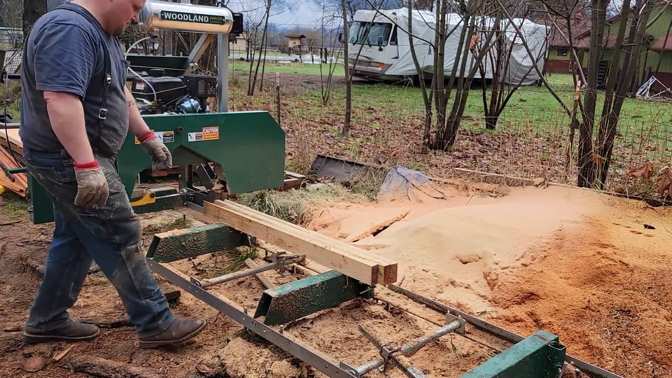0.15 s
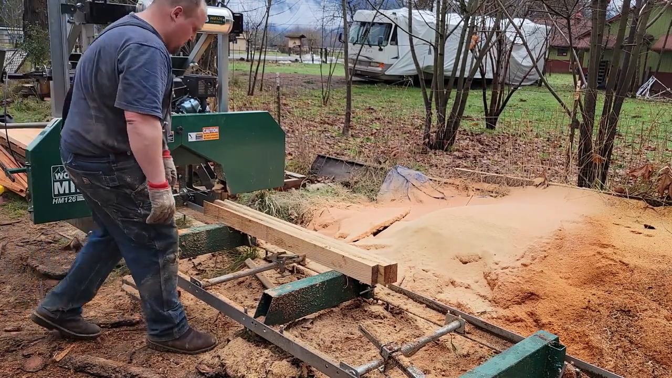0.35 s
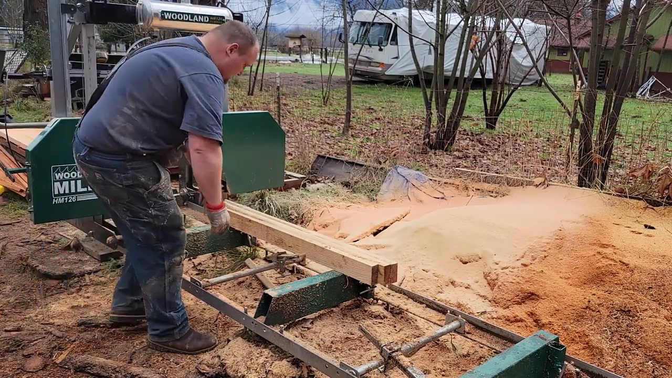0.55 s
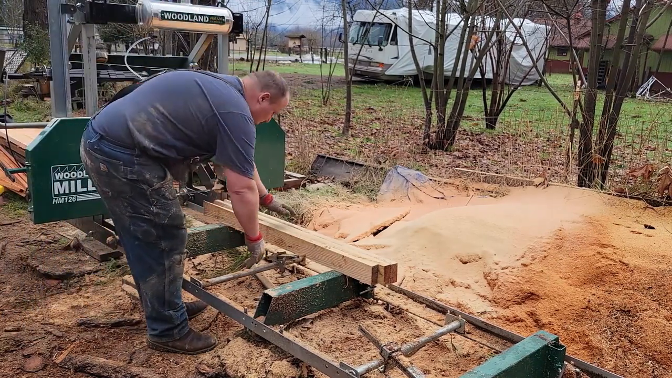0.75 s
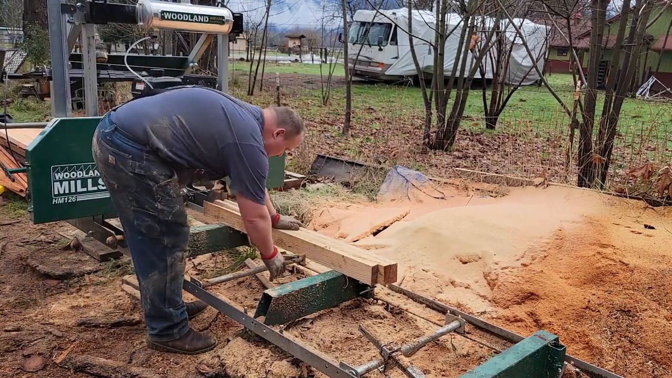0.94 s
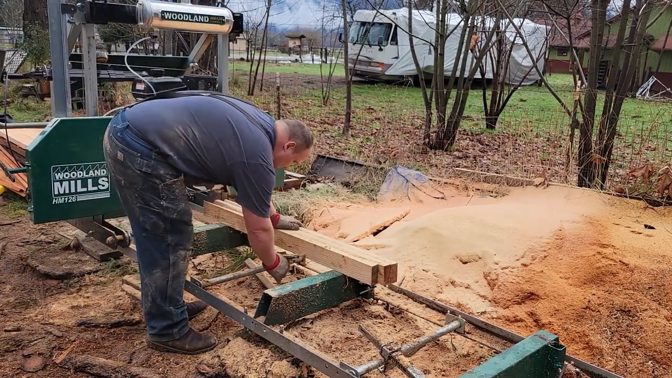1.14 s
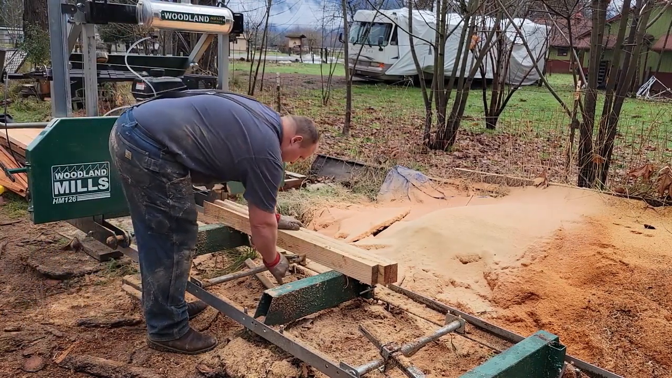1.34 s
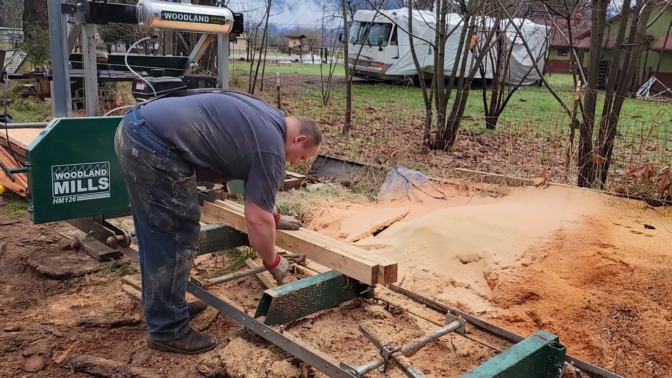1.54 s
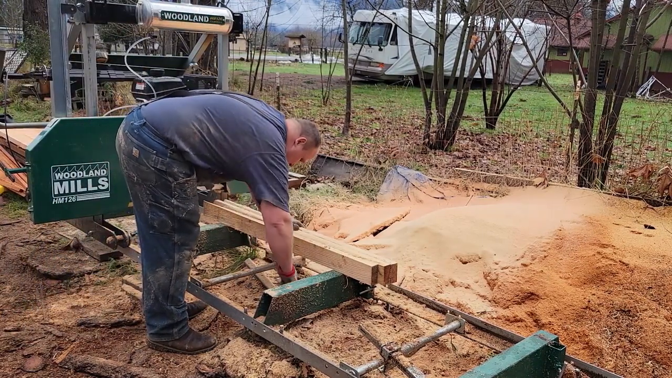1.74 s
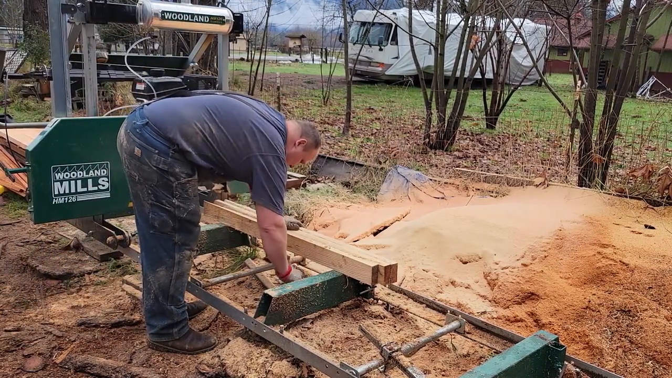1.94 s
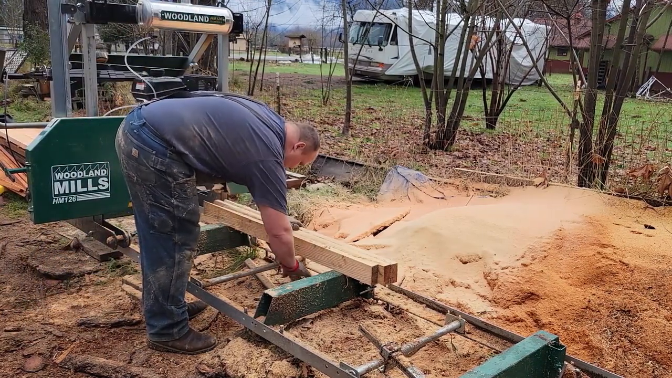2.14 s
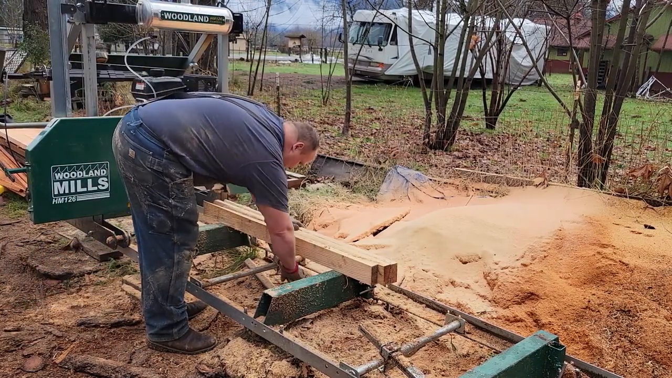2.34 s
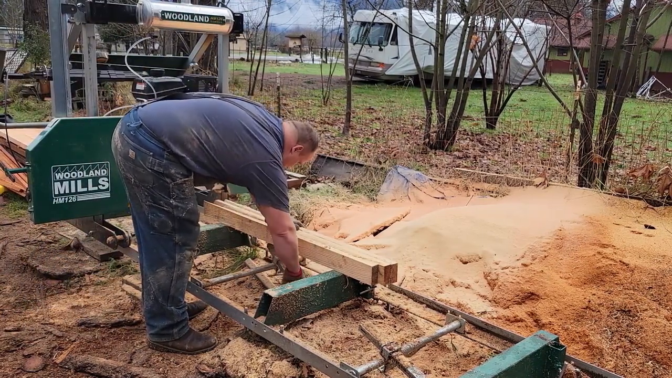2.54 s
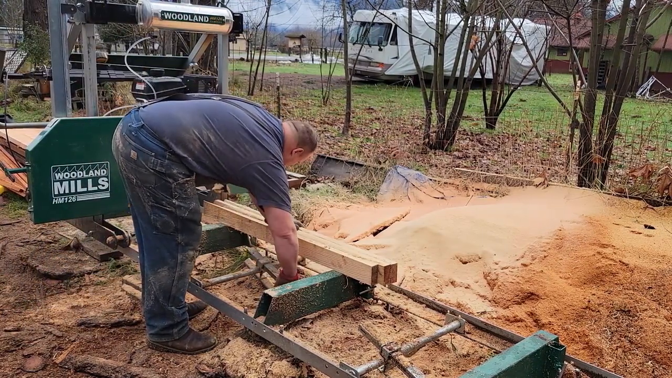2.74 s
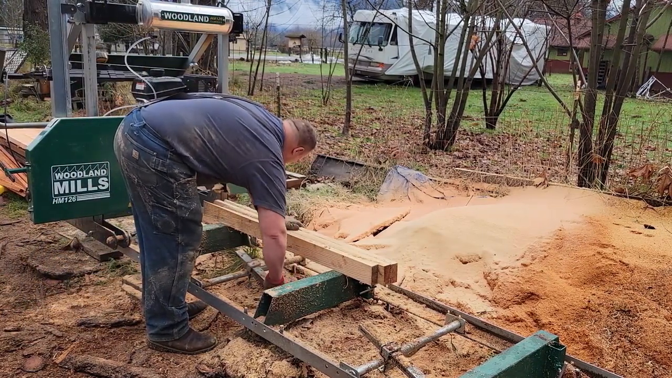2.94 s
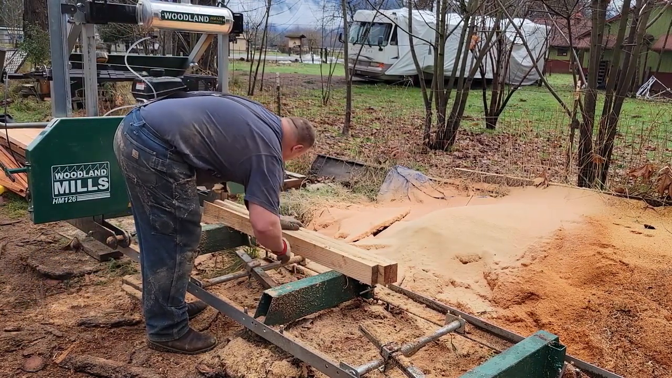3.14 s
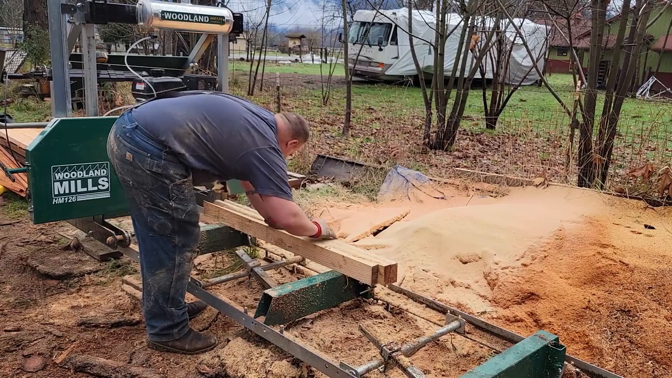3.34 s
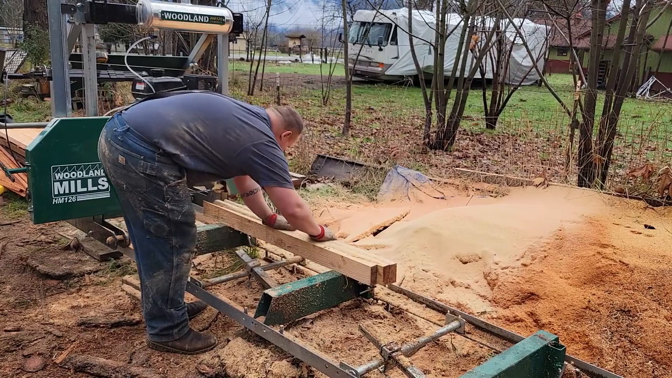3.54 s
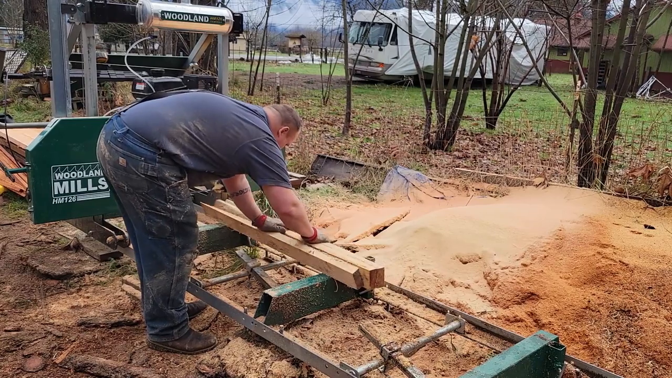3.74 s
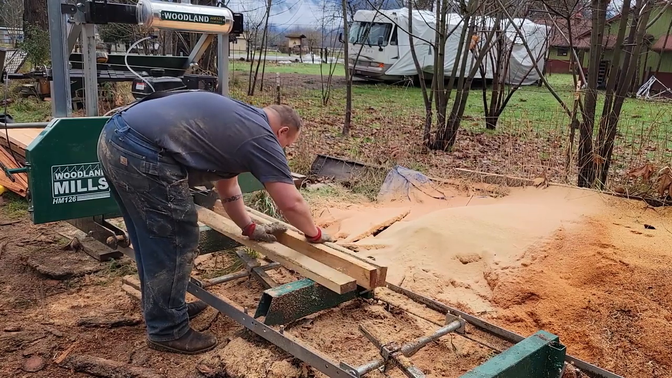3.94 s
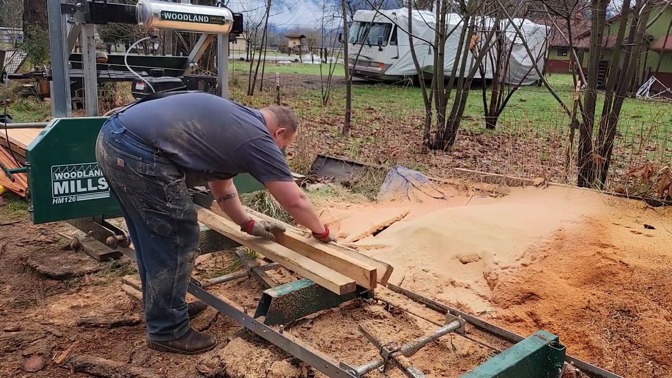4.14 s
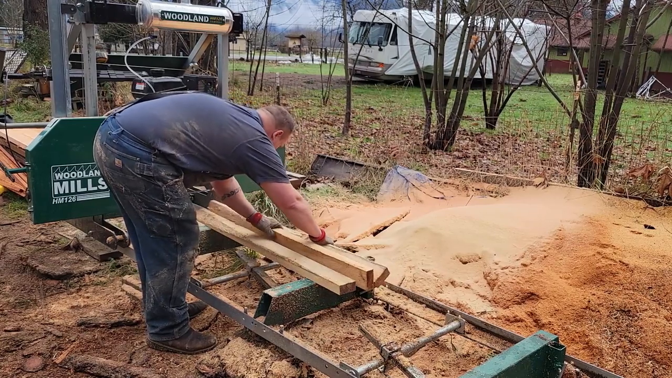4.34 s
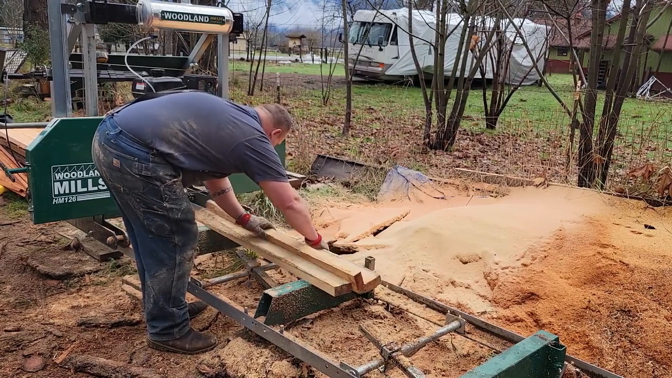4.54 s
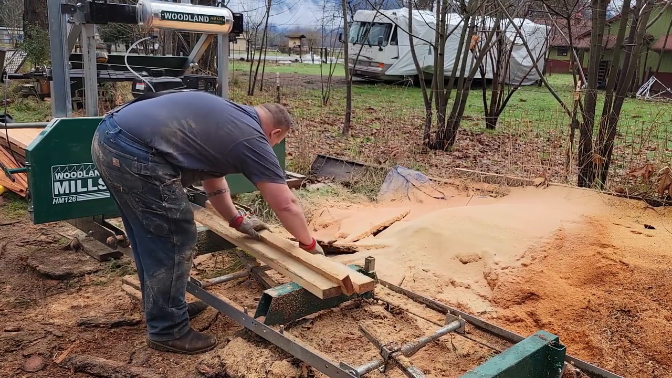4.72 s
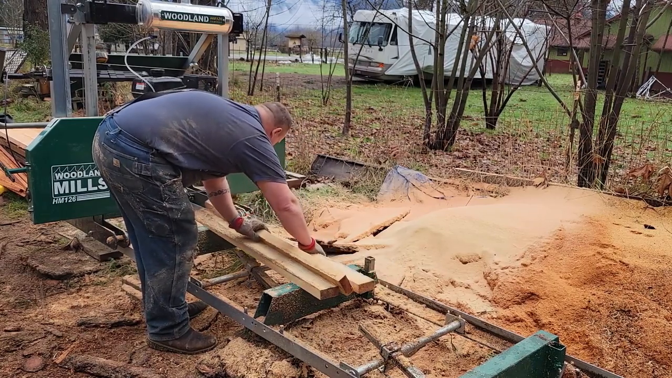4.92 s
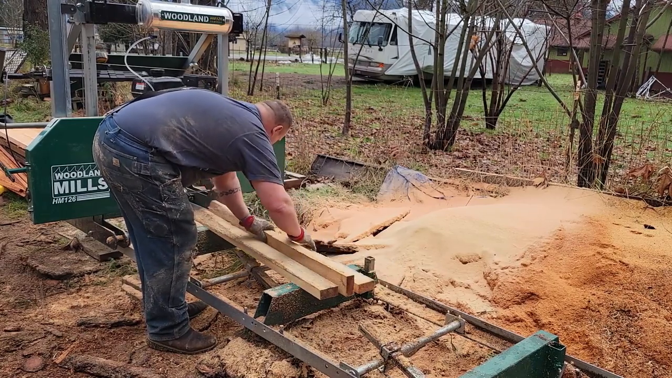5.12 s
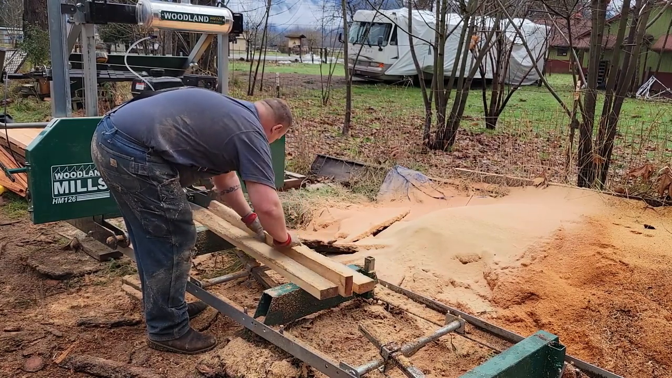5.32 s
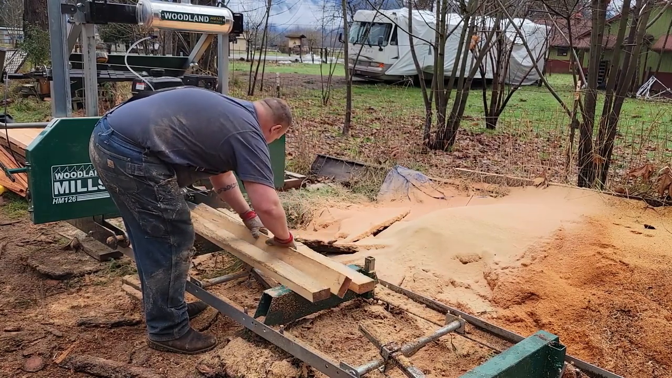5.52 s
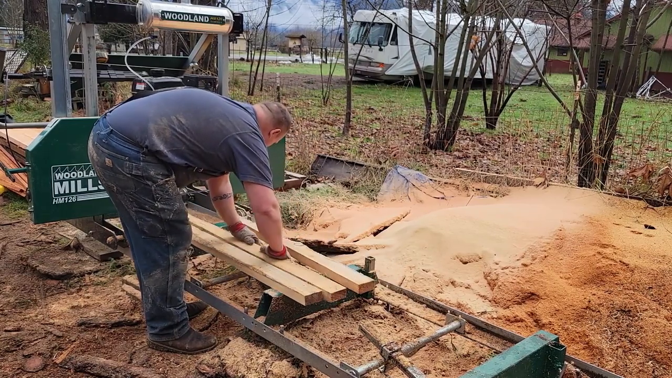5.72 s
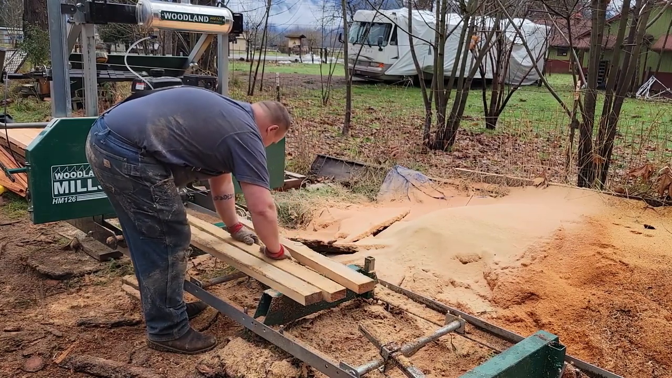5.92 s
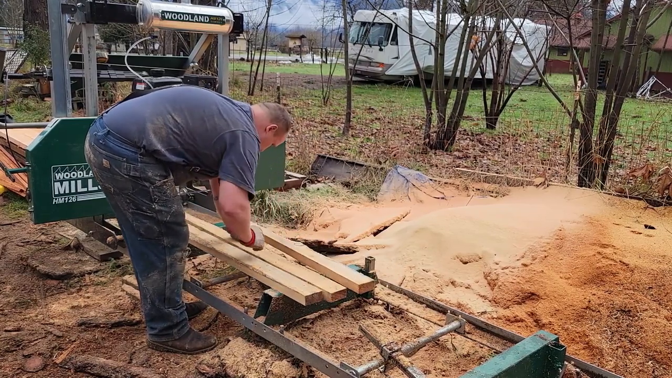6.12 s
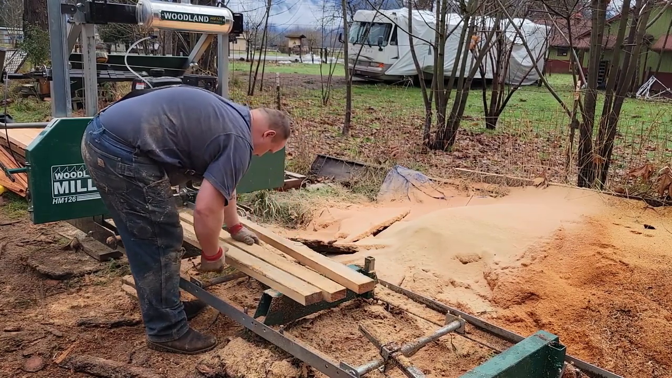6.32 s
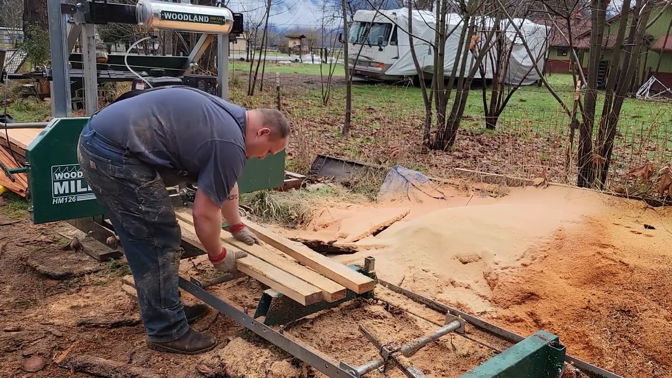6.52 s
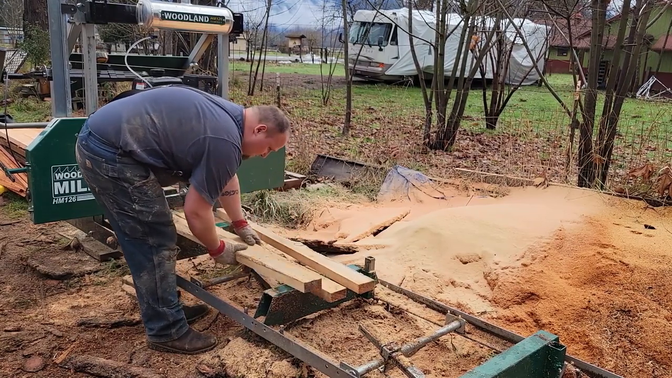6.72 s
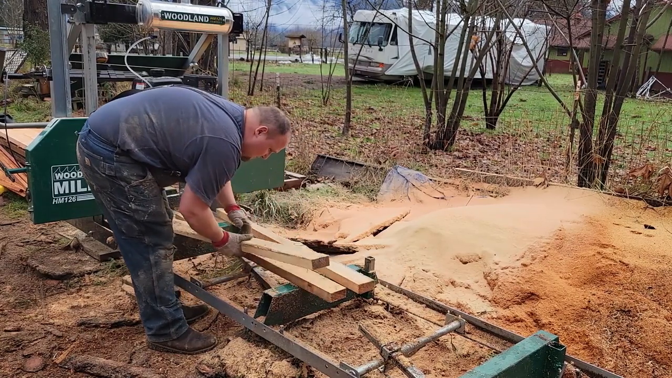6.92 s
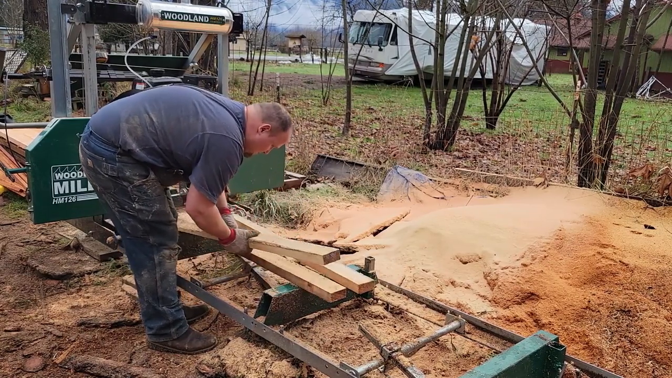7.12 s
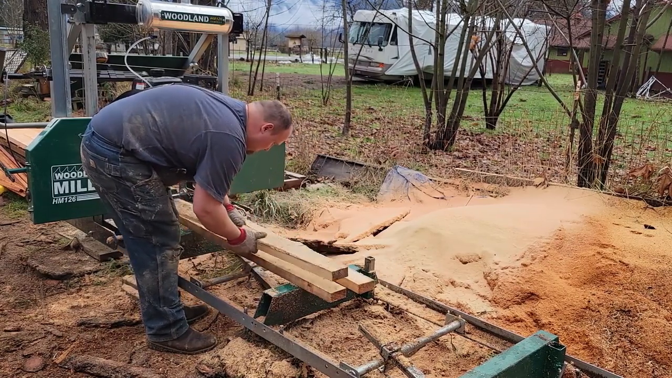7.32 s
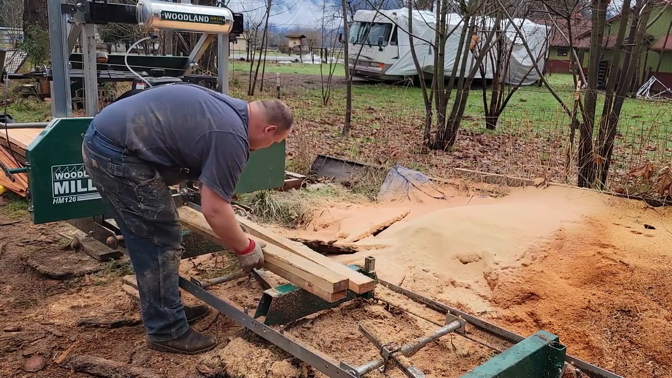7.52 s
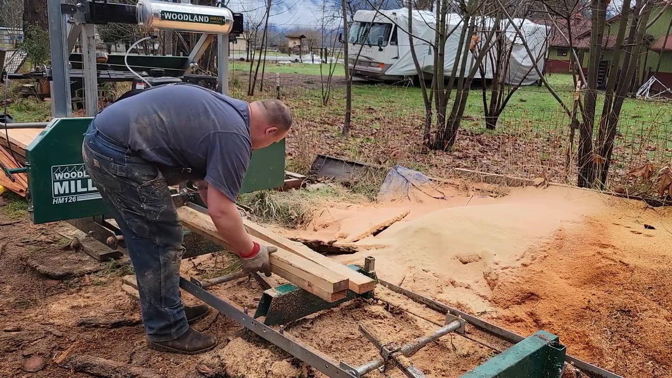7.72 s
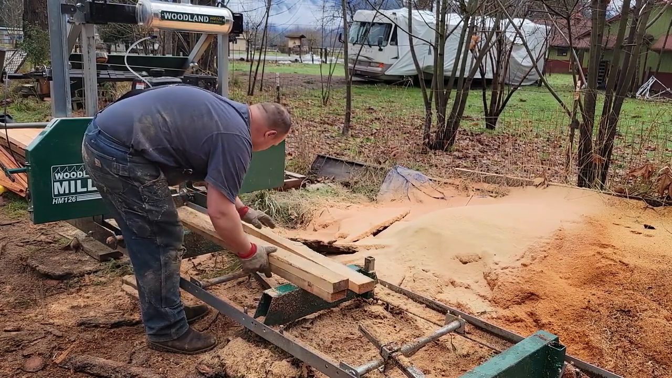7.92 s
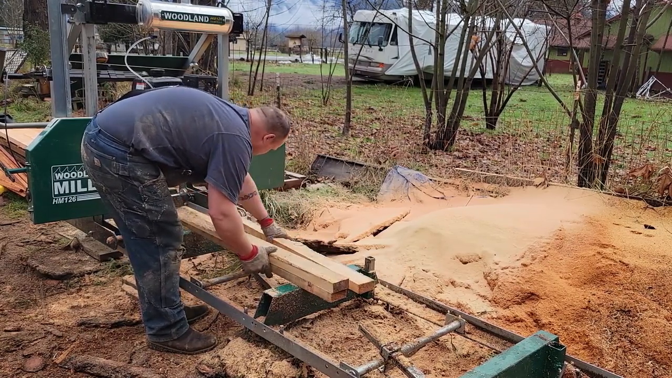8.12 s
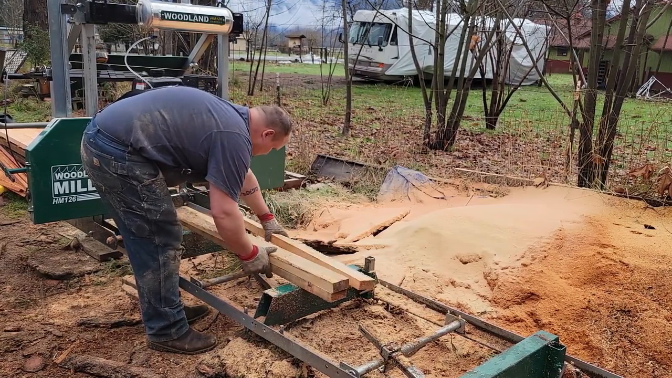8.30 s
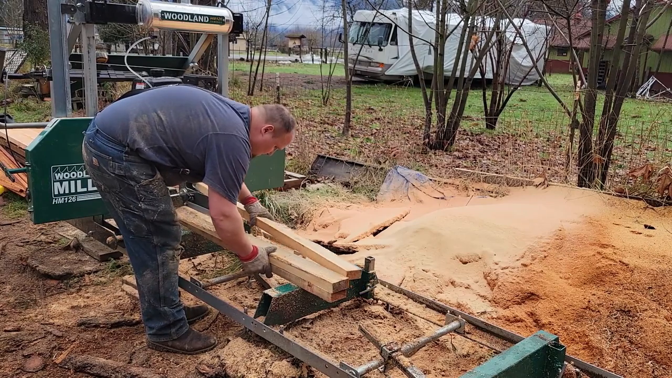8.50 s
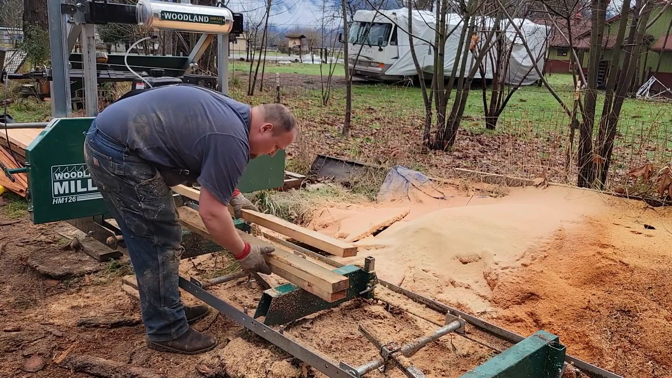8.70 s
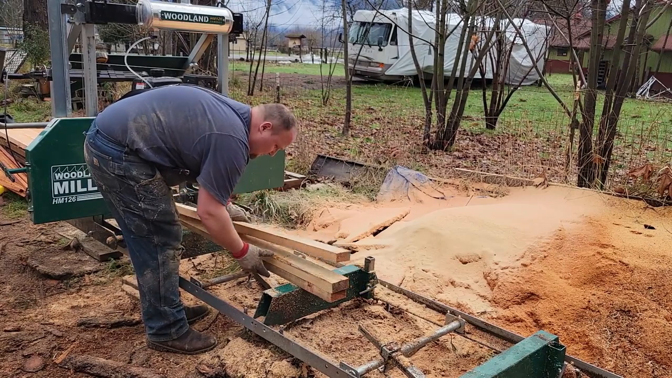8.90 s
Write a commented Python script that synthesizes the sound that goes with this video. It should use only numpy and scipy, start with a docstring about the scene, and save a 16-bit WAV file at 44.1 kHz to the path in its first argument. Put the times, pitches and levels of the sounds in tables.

```python
"""Stacking boards at a small sawmill

Outdoors, over a low machine hum, a worker steps up on wood chips, knocks the steel log clamp loose
and slides it back; chatter and friction ring its modes. Sawn boards are tipped onto the steel bed and
stacked, with rubs and bounces. Each blow rings their bending modes and the bed, and crushes sawdust."""
import sys
import numpy as np
from scipy import signal
from scipy.fft import rfft, irfft, next_fast_len
from scipy.io import wavfile
from scipy.ndimage import map_coordinates

SR = 44100
rng = np.random.default_rng(int(sys.argv[2]) if len(sys.argv) > 2 else 0)


def waveform_to_disk(signal):
    """Save audio, clipped to [-1, 1], as 16-bit WAV at the path in sys.argv[1]."""
    frames = np.transpose(np.atleast_2d(signal))
    scaled = np.clip(frames, -1, 1) * 32767
    samples = np.round(scaled).astype(np.int16)
    wavfile.write(sys.argv[1], SR, samples)


N = 395136
TIME = np.arange(N) / SR
BAND_EDGES_HZ = np.geomspace(22, 17000, 30)
BAND_CENTRES_HZ = np.sqrt(BAND_EDGES_HZ[1:] * BAND_EDGES_HZ[:-1])


def from_db(db):
    """Decibels to gain."""
    return np.exp(np.asarray(db) * np.log(10) / 20)


def unit_rms(x):
    """Scale to rms 1."""
    return x / np.sqrt(np.mean(x ** 2) + 1e-20)


def unit_onset(x):
    """Scale to rms 1 over the first 25 ms."""
    return x / np.sqrt(np.mean(x[:, :SR // 40] ** 2) + 1e-20)


def at_hz(table, hz):
    """Read a table on a log-frequency axis."""
    freq_hz, values = np.transpose(table)
    return np.interp(np.log(hz), np.log(freq_hz), values)


def butter(x, hz, kind="low", order=2):
    """Butterworth filter."""
    return signal.sosfilt(signal.butter(order, hz, kind, fs=SR, output="sos"), x)


def coloured(x, spectrum, tilt_db_per_oct=0):
    """Shape noise to a tilted spectrum, at rms 1."""
    size = next_fast_len(x.shape[-1])
    hz = np.maximum(np.fft.rfftfreq(size, 1 / SR), 1)
    gain = from_db(at_hz(spectrum, hz) + tilt_db_per_oct * np.log2(hz))
    return unit_rms(irfft(rfft(x, size) * gain, size)[..., :x.shape[-1]])


def stereo(pair, correlation):
    """Two independent signals to correlated left and right."""
    mid, side = pair
    return np.sqrt(1 + correlation) * mid + np.sqrt(1 - correlation) * side * [[1], [-1]]


def add(out, start_s, sound, pan_db):
    """Mix in a stereo sound; pan_db is left minus right."""
    at = round(start_s * SR)
    panned = sound * from_db([[pan_db / 2], [-pan_db / 2]])
    out[:, at:at + sound.shape[1]] += panned[:, :N - at]


def wobble(cutoff_hz):
    """Slow random fluctuation, rms 1."""
    return unit_rms(butter(rng.standard_normal(N), cutoff_hz))


def slips(size, per_s, spread_db):
    """Friction: tiny catches of random size at random moments."""
    spread = from_db(spread_db * np.minimum(rng.exponential(1, (2, size)), 4))
    heights = spread * rng.standard_normal((2, size))
    caught = rng.random((2, size)) < per_s / SR
    return stereo(heights * caught, correlation=0.25)


# Stereo likeness of noise: freq_hz, correlation
CORRELATION = [(100, 1), (250, 0.76), (600, 0.09), (2000, 0.23), (12000, 0.69)]


def noise_bands(size):
    """Third-octave stereo noise: bands x 2 x size."""
    white = rng.standard_normal((2, 2, size + SR // 10))
    bands = []
    for k, hz in enumerate(BAND_CENTRES_HZ):
        pair = butter(white[k % 2], BAND_EDGES_HZ[k:k + 2], "band")[:, -size:]
        bands.append(stereo(pair, at_hz(CORRELATION, hz)))
    return np.array(bands)


def dense_modes(bands, spectrum, decay, t, t60_scale, crack_s, weight=1):
    """Modes too dense to tell apart: a short crack, then a tail dying band by band."""
    hz = BAND_CENTRES_HZ[:, None]
    start = rng.integers(bands.shape[2] - len(t))
    t60_s = at_hz(decay, hz) * t60_scale
    envelopes = from_db(at_hz(spectrum, hz) - 60 * t / t60_s) * weight
    tail = np.einsum("bt,bct->ct", envelopes, bands[:, :, start:start + len(t)])
    crack = 1 + from_db(-2) * np.exp(-t / crack_s)
    return unit_onset(tail * crack)


# Hum spectrum: freq_hz, density_db
HUM_SPECTRUM = [(13, -61), (22, -32.5), (32, -26.5), (41, -13), (56, -5), (76, 5), (105, -2.5), (121, -11),
                (140, -18.5), (192, -14.5), (225, -20.5), (327, -29), (350, -28), (460, -60.5), (770, -120)]


def machine_hum(level_db=-47.5, throb_db=2.42, early_boost_db=4.5, eased_by_s=3.3, ease_s=0.93):
    """A low machine hum throbs unevenly, a little louder at first."""
    throb = wobble(cutoff_hz=8.7)
    early = np.clip((eased_by_s - TIME) / ease_s, 0, 1)
    hum = coloured(stereo(rng.standard_normal((2, N)), correlation=0.98), HUM_SPECTRUM)
    return from_db(level_db + early_boost_db * early + throb_db * throb) * hum


# Open-air spectrum: freq_hz, density_db
AIR_SPECTRUM = [(150, -30.5), (250, -3.5), (341, -7), (385, -14.5), (474, -8), (593, -10.5), (1220, -19),
                (1460, -20.5), (2200, -26.5), (6000, -39.5), (15500, -51)]


def open_air(level_db=-63.5):
    """A faint, steady, wide wash of air."""
    noise = stereo(rng.standard_normal((2, N)), correlation=0.1)
    return from_db(level_db) * coloured(noise, AIR_SPECTRUM)


# Dry scuff spectrum: freq_hz, density_db
SCUFF_SPECTRUM = [(150, -2), (300, 4.5), (600, -4), (1100, -4.5), (1700, 0.5), (2600, -5.5), (4800, -3),
                  (7000, -7), (10000, -13.5), (15000, -16)]
# Boots on wood chips: start_s, length_s, level_db, tilt_db_per_oct
BOOT_STEPS = [(0.14, .07, -47.5, -0.1), (0.263, 0.068, -56.5, -6.5), (0.675, 0.018, -47, -6.5)]
# Dry rubs and shuffles of gloves, boards and boots: start_s, length_s, level_db, tilt_db_per_oct
RUBS = [(1.71, 0.2, -55, -7), (2.345, 0.044, -43, -5), (3.253, .04, -72.5, 1), (3.41, .04, -63.5, -2.5),
        (3.584, .35, -63.5, -3), (3.833, .1, -56, -2), (4.42, 0.32, -69, -2), (4.98, 0.22, -79, -1),
        (5.3, .45, -67.5, -2), (5.386, .018, -54, 5.5), (6.577, .025, -59.5, -6.5), (6.962, .15, -65, -2.5),
        (7.04, 0.069, -63.5, -1.5), (7.33, .1, -63, -2), (7.55, 0.28, -53, -5.5),
        (8.108, .065, -67.5, -1.5)]


def scuffs(strokes, pan_db):
    """Dry friction in short gritty strokes that swell and fade."""
    out = np.zeros((2, N))
    for start_s, length_s, level_db, tilt in strokes:
        size = round(length_s * SR)
        grains = coloured(slips(SR // 2, per_s=3400, spread_db=1), SCUFF_SPECTRUM, tilt)
        grains = unit_rms(butter(grains, 170, "high")[:, -size:])
        add(out, start_s, from_db(level_db) * grains * signal.windows.tukey(size, 0.7), pan_db)
    return out


# Steel clamp's strong modes: freq_hz, nominal_width_hz, level_db
CLAMP_MODES = [(310.4, 38, -10.5), (495, 13, 6), (664.4, 60, -1), (911, 36, 1), (1172, 35, -4.5),
               (1400, 20, -2), (1720, 55, 0), (1910, 31, -5.5), (2010, 28, 0), (2447, 23, -1),
               (3040, 100, -6.5), (3158, 45, -10), (3440, 33, -13.5), (3850, 28, -10), (4370, 20, -17),
               (4540, 81, -12), (4865, 100, -11), (5040, 70, -15.5), (6270, 110, -15.5), (6660, 40, -22),
               (7610, 72, -19.5), (9300, 60, -28), (10500, 41, -27.5), (11100, 33, -36)]
# Its weak modes' spectrum: freq_hz, density_db
CLAMP_SPECTRUM = [(100, -17), (250, -15), (500, 2.5), (700, 2.5), (1100, -4.5), (1750, 5), (2250, 0),
                  (3000, -0.5), (5000, -12.5), (7000, -21.5), (10000, -33), (15000, -29)]
# Their decay: freq_hz, nominal_t60_s
CLAMP_DECAY = [(200, 0.58), (520, 0.27), (800, 0.28), (2000, .18), (5000, 0.25), (14000, 0.022)]


def clamp_response(bands, narrowing=1.9):
    """The clamp's ring after one tap, with independent phases left and right."""
    t = TIME[:SR // 2]
    hz, width_hz, level_db = np.transpose(CLAMP_MODES)[:, :, None]
    envelopes = from_db(level_db) * width_hz * np.exp(-np.pi * width_hz / narrowing * t)
    phases = 2 * np.pi * (hz * t + rng.random((2, *hz.shape)))
    strong = (envelopes * np.sin(phases)).sum(1)
    weak = [dense_modes(bands, CLAMP_SPECTRUM, CLAMP_DECAY, t, t60_scale=0.82, crack_s=0.00057)[0]
            for side in "LR"]
    return unit_onset(strong) + np.array(weak)


# Flat chatter spectrum: freq_hz, density_db
CHATTER_SPECTRUM = [(100, 0), (16000, 0)]
# Knocks on the clamp: start_s, level_db, tilt_db_per_oct, grip_db_per_s
CLANKS = [(1.14, -51, -1, 102), (1.456, -57, 5.5, -6), (1.713, -56, -3.5, 0.5), (1.870, -41.5, -4.5, 0),
          (1.91, -27, -1, 0), (1.929, -22.5, -0.5, -0.5), (1.938, -19.5, 0.13, 0), (2.299, -52, -4, -2),
          (2.369, -32.5, 5, 442), (2.392, -36.5, -3.5, -3)]


def clamp_clanks(response, chatter_peak_s=0.0034):
    """Brief steel-on-steel chatter rings the clamp; a firm grip damps it."""
    out, t = np.zeros((2, N)), TIME[:response.shape[1]]
    rise = t[:SR // 16] / chatter_peak_s
    swell = rise ** 2 * np.exp(-2 * rise)
    for start_s, level_db, tilt, grip_db_per_s in CLANKS:
        chatter = coloured(slips(len(swell), per_s=6200, spread_db=2.5), CHATTER_SPECTRUM, tilt)
        held = response * from_db(-max(grip_db_per_s, 0) * t)
        clank = unit_onset(signal.fftconvolve(held, chatter * swell, axes=1))
        add(out, start_s, from_db(level_db) * clank, pan_db=2)
    return out


# Pushes along the rail: start_s, length_s, level_db
PUSHES = [(1.443, 0.081, -49), (1.948, 0.064, -37), (2.529, 0.14, -39), (2.712, 0.061, -33.5),
          (2.751, .2, -35.5)]


def push_force_db(attack_s=0.041, sag_db_per_s=21, release_db_per_s=277):
    """Each push builds, sags as the clamp gives way, then dies out."""
    force = 0
    for start_s, length_s, level_db in PUSHES:
        t = np.maximum(TIME - start_s, 0)
        fall_db = sag_db_per_s * t + release_db_per_s * np.maximum(t - length_s, 0)
        force = force + np.minimum(t / attack_s, 1) * from_db(level_db - fall_db)
    return 20 * np.log10(force + 1e-9)


# Scrape colour: freq_hz, gain_db
SLIDE_COLOUR = [(200, 1), (320, 2), (480, -1.5), (670, 4), (1000, 2.5), (1700, 1), (2500, -6.5),
                (3500, -7.5), (5000, -2), (6500, -7), (10000, -4), (15000, -6)]


def clamp_slide(response, judder_db=3, firm_push_db=-40):
    """Uneven catches on a dusty rail keep the clamp ringing; a firmer push is brighter."""
    judder = from_db(judder_db * wobble(cutoff_hz=90))
    catches = slips(N, per_s=3300, spread_db=-1.5) * judder
    scrape = coloured(signal.fftconvolve(catches, response, axes=1)[:, :N], SLIDE_COLOUR)
    force_db = push_force_db()
    low = butter(scrape, 3500, order=1)
    high = (scrape - low) * from_db(0.32 * (force_db - firm_push_db))
    return from_db(force_db) * (low + high) * from_db([[1], [-1]])


def contact_gain(hz, cutoff_hz):
    """A soft contact excites few modes above its cutoff."""
    return 1 / np.sqrt(1 + (hz / cutoff_hz) ** 13)


# Bending modes by board: freq_hz, level_db, nominal_t60_s
BOARD_MODES = { "first": [(234, -18.5, 0.54), (452, -1, 0.43), (500.5, -1.5, 0.52), (608, -29, 0.23),
               (670, -1, 0.14), (722, -2.5, 0.28), (741, 6.5, 0.17), (930, -23, 0.73), (976, -25, 0.493),
               (1069, -27.5, 0.37), (1136, -9, 0.25), (1520, -19, 0.24), (1830, -8, 0.11),
               (2080, -14.5, 0.1), (2957, -22.5, 0.31)], "second": [(206, -28, 0.69), (234, -11, 0.13),
               (432, -2.5, 0.22), (638, -1.5, 0.18), (739, -12, 0.26), (770, -27, 0.64), (862, -10.5, 0.19),
               (1040, -49, 0.13), (1210, -17.5, 0.095)], "third": [(248.5, -5.5, 0.14), (461, 1.5, 0.38),
               (543, -0.5, 0.36), (655, -12.5, 0.29), (699, 6.5, 0.14), (780, -18.5, 0.67),
               (938, 2.5, 0.16), (1046, -22, 0.16), (1300, -19, 0.2), (1643, -28, 0.14),
               (1740, -38.5, 0.15), (1890, -26, 0.21), (2363, -25, 0.12)], "fourth": [(245, -12, 0.47),
               (316, -12, 0.18), (486, 0, 0.2), (440, 1, 0.14), (690, 7.5, 0.15), (800, -23.5, 0.7),
               (990, -14.5, 0.72), (1410, -20.5, 0.042)], "top": [(187.5, -8, 1.4), (299, -8, 0.24),
               (468, -2, 0.61), (613, -23.5, 0.63), (687, 5, 0.19), (780, 3.5, 0.17), (730, -19.5, 0.99),
               (844, -2.5, 0.33), (906, 4.5, 0.047), (996, -23, 0.2), (1200, -7, 0.13), (1202, -16, 0.54),
               (1284, -7, 0.26), (1260, -18, 0.18), (1470, -3.5, 0.16), (1800, -22.5, 0.27),
               (1854, 2, 0.061), (2884, -31, 0.25)], }


def board_ring(board, cutoff_hz, t, t60_scale, scatter_rad=0.18):
    """A struck board's bending modes decay, slightly out of phase left and right."""
    hz, level_db, nominal_t60_s = np.transpose(BOARD_MODES[board])[:, :, None]
    jitter_db, skew = rng.standard_normal((len(hz), 2, 1)).swapaxes(0, 1)
    t60_s = np.minimum(nominal_t60_s, 0.5) * t60_scale
    envelopes = from_db(level_db + jitter_db - 60 * t / t60_s) * contact_gain(hz, cutoff_hz)
    phases = 2 * np.pi * (hz * t + rng.random(hz.shape))
    sides = [(envelopes * np.sin(phases + side * scatter_rad * skew)).sum(0) for side in (1, -1)]
    return unit_onset(np.array(sides))


# Crushed sawdust spectrum: freq_hz, density_db
GRIT_SPECTRUM = [(700, -29.5), (1500, -6.5), (2200, 4), (3000, 4), (3800, -3.5), (4600, -6.5),
                 (7000, -15.5), (10000, -21), (15000, -27.5)]


def grit(t, t60_s=0.17, crack_s=0.0031):
    """Sawdust and fibres crackle in the contact."""
    crackle = coloured(slips(len(t), per_s=6000, spread_db=-3), GRIT_SPECTRUM)
    crack = 1 + 1.3 * np.exp(-t / crack_s)
    return unit_onset(crackle * from_db(-60 * t / t60_s) * crack)


# Board landings: start_s, level_db, board, contact_hz, weak_modes_db, grit_db, rattle_s, pan_db
LANDINGS = [ (1.546, -49.5, "fourth", 400, 9.5, -28.5, 0.01, -6),
            (3.918, -11.5, "first", 1460, -1, -24.5, 0.09, 1),
            (4.287, -37, "third", 1000, 0.5, -36.5, 0.01, 2.5),
            (4.483, -33, "fourth", 850, -2.5, -37, 0.065, 1),
            (4.626, -25, "second", 824, -5, -24.5, 0.01, 1),
            (4.639, -19, "second", 807, -6, -49.5, 0.01, -0.5),
            (5.383, -30, "fourth", 800, -10.5, -35.5, 0.01, 0),
            (5.691, -11.5, "third", 1650, -3.5, -44.5, 0.04, 0.5),
            (5.803, -45, "third", 334, -24, -31, 0.01, 14),
            (6.891, -60.5, "first", 250, -9.5, -35, 0.01, -1),
            (7.436, -21, "top", 800, -2.5, -26.5, 0.01, 4),
            (7.474, -11, "top", 3000, 13.5, -33.5, 0.01, 1.5),
            (7.478, -16, "top", 2500, 1, -37, 0.01, -2.5), (8.540, -51.5, "top", 670, 5.5, -10, 0.01, 2),
            (8.947, -30, "second", 831, -10, -35, 0.01, -3), ]


def board_blows(bounce_s=0.026, rebound_db=-5.5, loss_db=3):
    """Each landing, then even bounces while it rattles, each weaker and softer."""
    for start_s, level_db, board, contact_hz, weak_db, grit_db, rattle_s, pan_db in LANDINGS:
        yield start_s, level_db, board, contact_hz, weak_db, grit_db, pan_db
        for k in range(1, int(rattle_s / bounce_s) + 1):
            softening = 0.7 ** k
            yield (start_s + k * bounce_s, level_db + rebound_db - k * loss_db, board,
                   contact_hz * softening, weak_db, grit_db + 40 * np.log10(softening), pan_db)


# Weak modes of boards and bed: freq_hz, density_db
WOOD_SPECTRUM = [(70, -19.5), (130, -14.5), (190, -10), (300, -0.5), (380, -8), (480, 3.5), (1000, 4),
                 (1450, -1.5), (2000, -8), (2350, -16.5), (2900, -12.5), (3500, -27.5), (4300, -32.5),
                 (8000, -50), (15000, -49.5)]
# Their decay: freq_hz, nominal_t60_s
WOOD_DECAY = [(100, 0.9), (250, 0.24), (500, 0.38), (750, 0.19), (1200, 0.077), (2000, 0.2), (5000, 0.053),
              (14000, 0.15)]


def board_clacks(bands, t60_scale=0.9, rise_s=0.001):
    """Each blow rings the wood and crushes grit; the hand shortens the ring by t60_scale."""
    out, t = np.zeros((2, N)), TIME[:SR * 2 // 5]
    attack = 1 - np.exp(-t / rise_s)
    for start_s, level_db, board, contact_hz, weak_db, grit_db, pan_db in board_blows():
        strong = board_ring(board, 2 * contact_hz, t, t60_scale)  # an octave more reach than the weak
        weight = contact_gain(BAND_CENTRES_HZ[:, None], contact_hz)
        weak = dense_modes(bands, WOOD_SPECTRUM, WOOD_DECAY, t, t60_scale, crack_s=0.0018, weight=weight)
        clack = unit_onset(strong + from_db(weak_db) * weak) + from_db(grit_db) * grit(t)
        add(out, start_s, from_db(level_db) * clack * attack, pan_db)
    return out


def tick(start_s=4.291, level_db=-34):
    """One thin, very short tick."""
    out = np.zeros((2, N))
    out[:, round(start_s * SR)] = from_db(level_db)
    return out


def bed_echo(x, lags_s=(0.0013, 0.0016), gain_db=-13):
    """The narrow steel bed mirrors only the treble, a moment late, which combs it."""
    treble = butter(x, 2200, "high")
    delayed = [np.interp(TIME - lag_s, TIME, side) for side, lag_s in zip(treble, lags_s)]
    return from_db(gain_db) * np.array(delayed)


# Steel bed modes: freq_hz, t60_s, gain_db
BED_MODES = [(189, 0.46, -13.5), (296, 0.19, -10.5), (442, 0.7, -17), (484, 0.55, -8)]


def bed_ring(x):
    """Every blow feeds the steel bed, whose few low modes ring on."""
    out = np.zeros_like(x)
    for hz, t60_s, gain_db in BED_MODES:
        q = np.pi * hz * t60_s / np.log(1000)
        out += from_db(gain_db) * signal.lfilter(*signal.iirpeak(hz, q, fs=SR), x)
    return out


def yard_reverb(x, t60_s=0.63, rise_s=0.03, cutoff_hz=1840, gain_db=-21.5):
    """Trees and the mill scatter back a faint, dull tail."""
    t = TIME[:SR]
    tail = rng.standard_normal((2, SR)) * from_db(-60 * t / t60_s) * (1 - np.exp(-t / rise_s))
    tail = butter(tail / np.sqrt(np.sum(tail ** 2) / 2), cutoff_hz)
    return from_db(gain_db) * signal.fftconvolve(x, tail, axes=1)[:, :N]


def scene(right_lag_s=0.00015):
    """The work lies a little to the left in the open yard, so the right side hears it later."""
    bands = noise_bands(SR)
    steel = clamp_response(bands)
    work = board_clacks(bands) + clamp_clanks(steel) + clamp_slide(steel)
    work += scuffs(BOOT_STEPS, pan_db=2) + scuffs(RUBS, pan_db=4)
    work[1] = map_coordinates(work[1], [np.arange(N) - right_lag_s * SR], order=3)
    surroundings = bed_echo(work) + bed_ring(work) + yard_reverb(work)
    return work + surroundings + tick() + machine_hum() + open_air()


def record(dry, stopband_hz=16300):
    """Clip at full scale, then cut the top treble."""
    lowpass = signal.cheby2(14, 70, stopband_hz, fs=SR, output="sos")
    return signal.sosfilt(lowpass, np.clip(dry, -1, 1))


dry = scene()
out = record(dry)
waveform_to_disk(out)
```